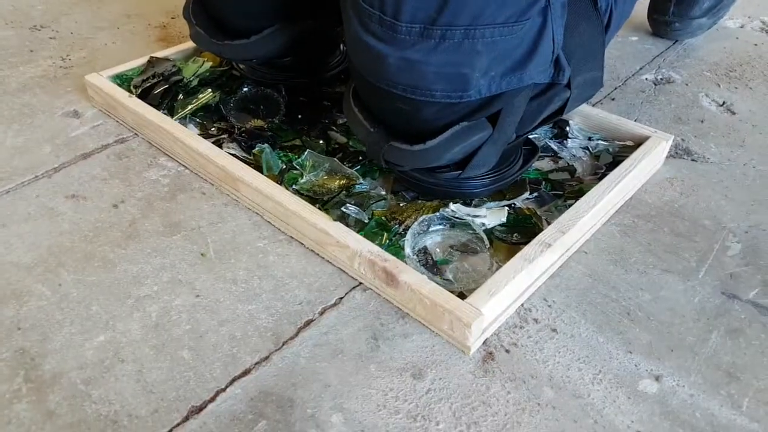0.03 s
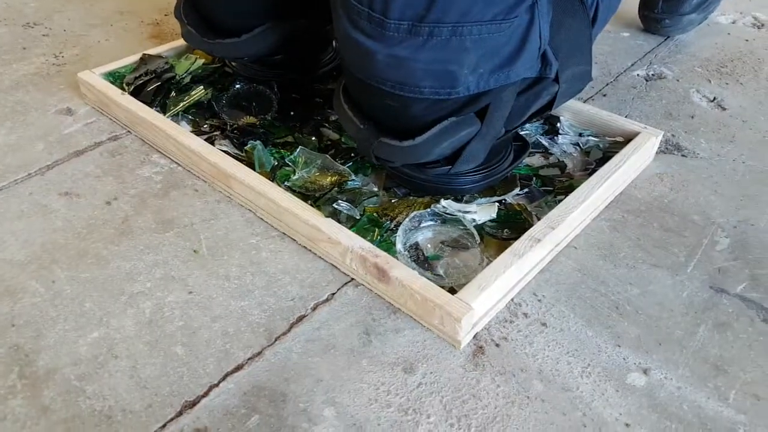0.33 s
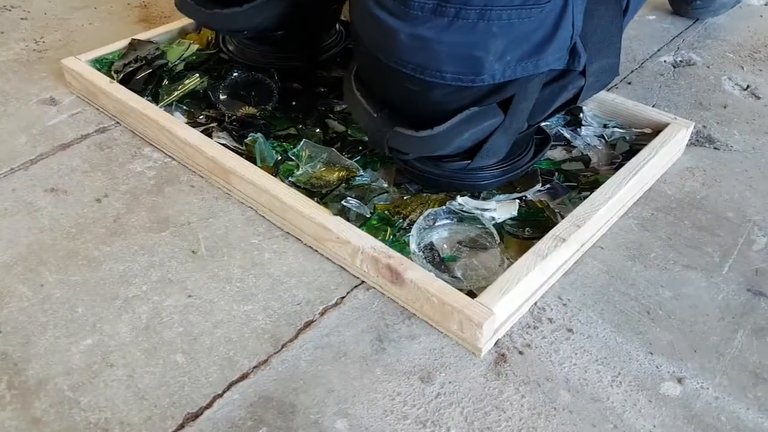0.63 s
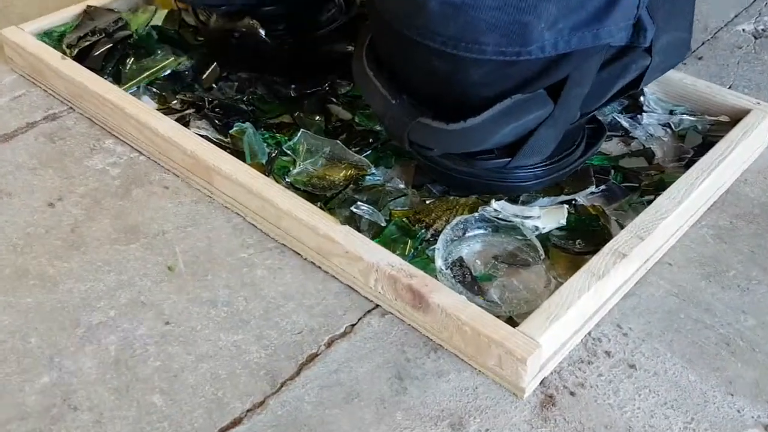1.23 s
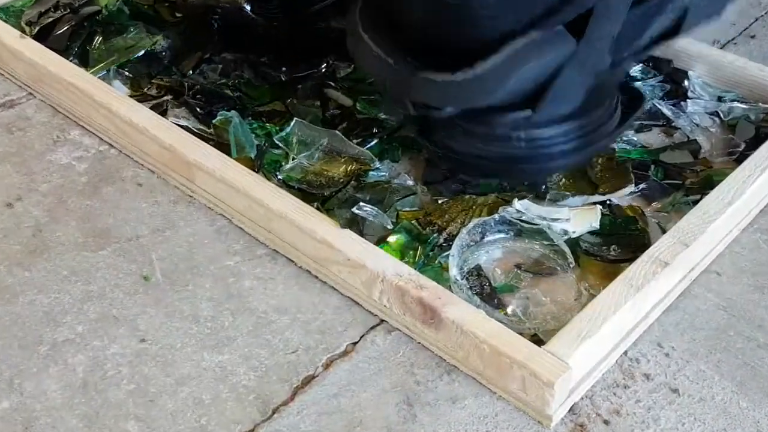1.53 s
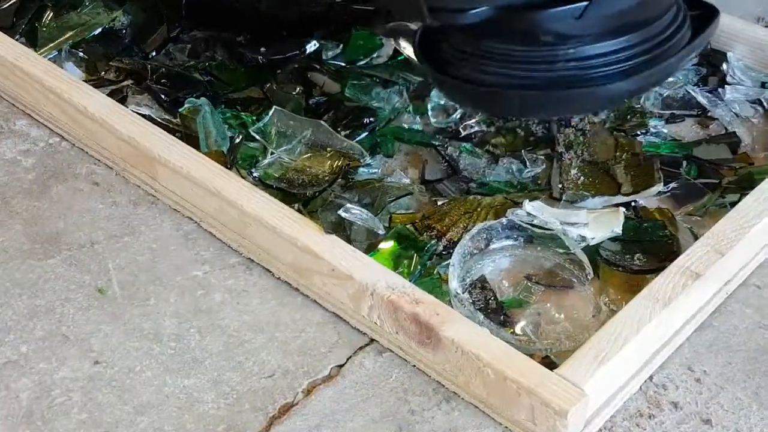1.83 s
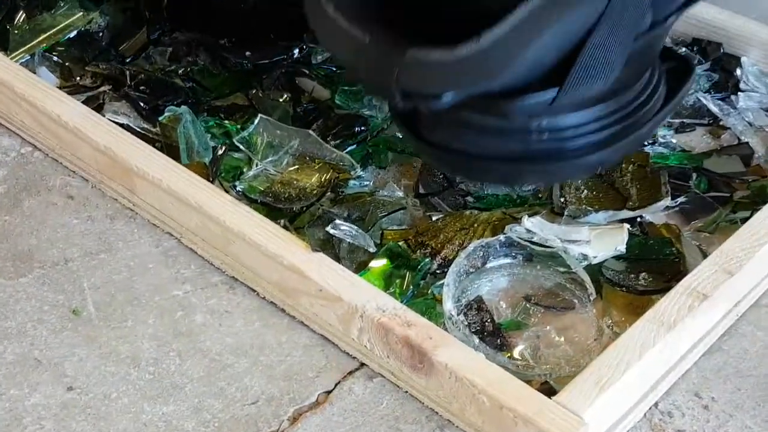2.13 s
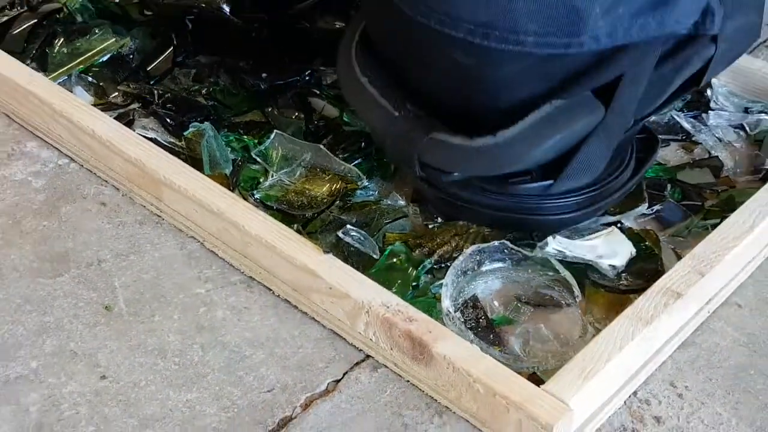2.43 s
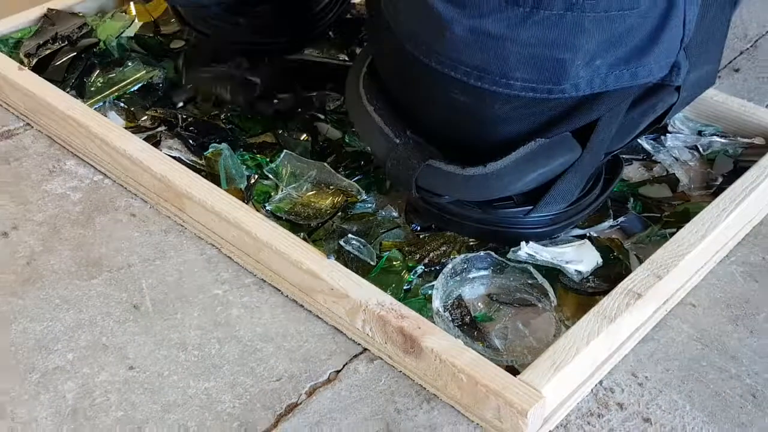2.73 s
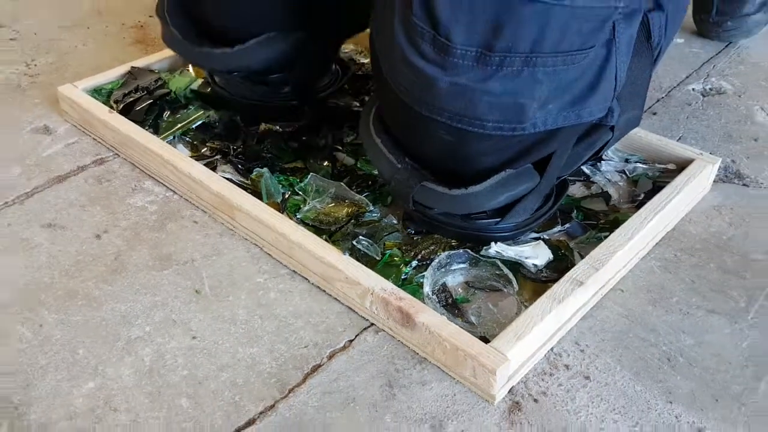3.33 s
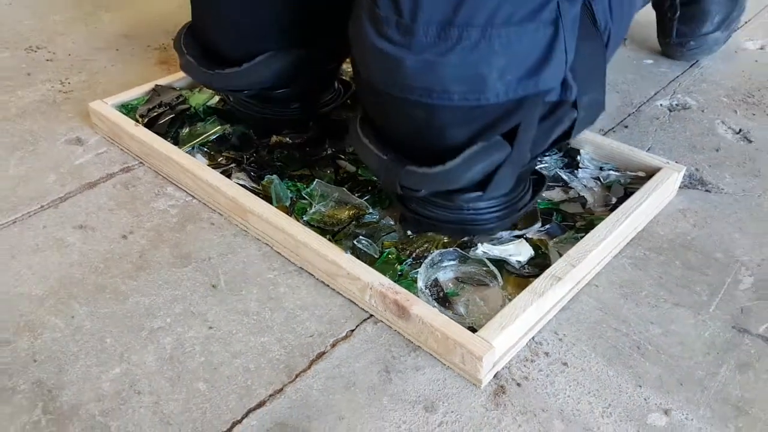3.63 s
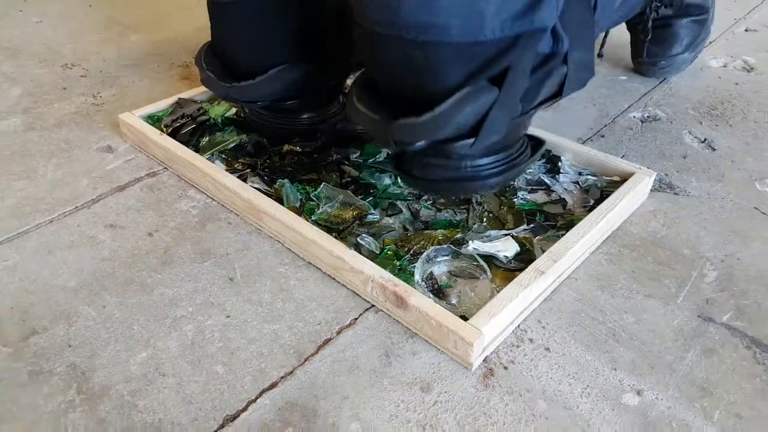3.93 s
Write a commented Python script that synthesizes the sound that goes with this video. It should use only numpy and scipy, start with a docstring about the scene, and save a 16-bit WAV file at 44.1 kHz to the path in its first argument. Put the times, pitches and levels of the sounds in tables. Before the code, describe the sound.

Broken glass crunches, cracks and clinks under a person's shifting knees in an echoing room.

```python
"""Padded knees shift on broken bottles in a wooden tray on the concrete floor of a hard, echoing room.
A low rumble and faint trouser cloth come first. After half a second the loaded shards start to grind
and snap, and loose pieces slip and clink. Scattered cracks build to a heavy push near 2.5 s, which
knocks shards against the floor of the tray. A lull follows near 3 s, then a last run of fractures
ends in a sharp crack and a knock near 3.8 s."""
import sys
import numpy as np
from scipy import signal
from scipy.io import wavfile
from scipy.ndimage import uniform_filter1d, minimum_filter1d

SR = 44100
rng = np.random.default_rng(int(sys.argv[2]) if len(sys.argv) > 2 else 0)


def to_wav(sig):
    """Store sig (one row per channel, or 1-D mono) as 16-bit WAV at the path in sys.argv[1].

    Samples outside -1..1 are clipped; the rate is SR.
    """
    pcm = np.clip(np.atleast_2d(sig), -1, 1) * 32767
    pcm = np.round(pcm).astype(np.int16)
    wavfile.write(sys.argv[1], SR, pcm.T)  # frames by channels


N = 176400
TIME = np.arange(N) / SR
CUTOFF_HZ, SNAP_PAN_DB = 15800, -12

# Shards breaking: time_s, snap_db, treble_db, pitch_hz
FRACTURES = [(0.5176, -38, -41, 3500), (0.5704, -31, -42, 3170), (0.7084, -21.5, -27.5, 3760),
             (0.7695, -7.5, -24, 3160), (1.139, -26, -36, 2000), (1.1934, -22, -39, 2260),
             (1.3863, -31, -43, 3710), (1.5268, -28.5, -30, 3900), (1.548, -24.5, -32.5, 3800),
             (1.5812, -22.5, -29.5, 3030), (1.83, -23, -35.5, 3780), (1.958, -19.5, -30, 3720),
             (2.2077, -15.5, -26.5, 4000), (2.3017, -18, -33, 3530), (2.3667, -18.5, -22, 3800),
             (2.4359, -20.5, -38, 3200), (2.5266, -12, -19, 2700), (2.5965, -10.5, -19.5, 3320),
             (2.6412, -17, -23, 2930), (2.967, -39, -47, 4000), (3.2336, -38.5, -45, 3700),
             (3.2636, -35, -43, 3270), (3.4108, -22, -31.5, 3240), (3.4249, -17, -51, 3590),
             (3.488, -17, -33, 3620), (3.527, -16, -32, 3660), (3.596, -18, -23, 3840),
             (3.6332, -16, -28.5, 3480), (3.6906, -18.5, -24, 3700), (3.7759, -8, -20.5, 3120)]
# Spectrum of glass grinding on glass: frequency_hz, density_db
GRIND_SPECTRUM = [(120, -75), (350, -4.5), (2400, -3.5), (3400, -0.5), (4700, -22), (6600, -18),
                  (9000, -49), (13000, -17), (16000, -31.5)]
# Stereo image of the bed of shards: frequency_hz, left_over_right_db, correlation
BED_IMAGE = [(155, -14, 0.97), (1050, 1, 0.25), (3500, -9, 0.18), (10400, 13, 0.059)]


def from_db(db):
    """Amplitude grows tenfold every 20 dB."""
    return 10 ** (np.asarray(db) / 20)


def rms_one(x):
    """Normalise to unit mean power."""
    return x / np.sqrt(np.mean(x ** 2) + 1e-20)


def at_hz(points, hz, column=1):
    """Interpolate a table column on a logarithmic frequency axis."""
    table = np.array(points)
    return np.interp(np.log(hz), np.log(table[:, 0]), table[:, column])


def band(x, low_hz, high_hz):
    """Causal Butterworth band-pass."""
    sos = signal.butter(2, [low_hz, min(high_hz, .48 * SR)], "band", fs=SR, output="sos")
    return signal.sosfilt(sos, x + 1e-18)


def pan(db):
    """A level difference, left over right, places a source at constant power."""
    return rms_one(from_db(np.array([[db], [-db]]) / 2))


def stereo(pair, correlation):
    """The sum and difference of two independent signals set the correlation between the ears."""
    mid = np.sqrt(1 + correlation) * pair[0]
    side = np.sqrt(1 - correlation) * pair[1]
    return (mid + side * [[1], [-1]]) / np.sqrt(2)


def add(out, time_s, sound):
    """Superpose a short sound at a given time."""
    i = int(time_s * SR)
    out[:, i:i + sound.shape[1]] += sound[:, :N - i]


def noise_bands(size):
    """Split independent noises into half-octave bands: centre_hz, noise pair."""
    edges_hz = 22 * 2 ** (np.arange(20) / 2)
    white = rng.standard_normal((2, 2, size))
    return [(np.sqrt(low * high), band(white[k % 2], low, high))
            for k, (low, high) in enumerate(zip(edges_hz, edges_hz[1:]))]


def coloured_noise(spectrum, levels):
    """Weighted noise bands sum to a fixed spectrum whose level follows a contour in time."""
    noise = sum(from_db(at_hz(spectrum, hz)) * stereo(pair, at_hz(BED_IMAGE, hz, column=2))
                for hz, pair in noise_bands(N))
    return from_db(np.interp(TIME, *np.transpose(levels))) * rms_one(noise)


def impulses(per_s, spread_db=2.5):
    """A Poisson train of clicks, many small and a few large."""
    occurs = rng.random(N) < per_s / SR
    return occurs * from_db(spread_db * np.minimum(rng.exponential(1, N), 3.5))


def ring(clicks, hz, t60_s):
    """A two-pole resonator answers each click with a damped sine."""
    radius, angle = from_db(-60 / (t60_s * SR)), 2 * np.pi * hz / SR
    return signal.lfilter([0, np.sin(angle)], [1, -2 * radius * np.cos(angle), radius ** 2], clicks + 1e-18)


def equal_energy(x, length_s=0.0034):
    """Give each channel of a transient the energy of unit power held for length_s."""
    return x / np.sqrt(np.sum(x ** 2, axis=1, keepdims=True) / (length_s * SR))


def burst(fall_s, low_hz, high_hz, correlation):
    """A broadband transient: exponentially decaying noise in one band."""
    t = TIME[:SR // 30]
    noise = stereo(rng.standard_normal((2, len(t))), correlation)
    return equal_energy(band(noise * np.exp(-t / fall_s), low_hz, high_hz))


def rumble():
    """Low-frequency noise fills the room, slowly swelling and sinking."""
    # Loudness contour: time_s, level_db
    swell = [(0, -36.5), (.8, -38.5), (1.0, -50.5), (1.35, -50), (1.7, -39.5), (2.6, -39.5), (3.2, -46),
             (4, -42.5)]
    # Rumble spectrum: frequency_hz, density_db
    spectrum = [(30, -37), (80, -11.5), (105, 3.5), (145, -8), (250, -14.5), (5000, -58)]
    return coloured_noise(spectrum, swell)


def cloth():
    """Friction of trousers and knee pads radiates faint broadband noise."""
    # Strength of the rubbing: time_s, level_db
    rubbing = [(.2, -54.5), (.4, -50), (1.0, -60), (1.45, -48.5), (3.2, -47.5), (3.7, -42)]
    # Rustle spectrum: frequency_hz, density_db
    spectrum = [(100, -21.5), (450, 11.5), (3000, -3), (15000, -39)]
    return coloured_noise(spectrum, rubbing)


def room(x, first_echo_s=0.0021, full_s=0.022, early_t60_s=0.15):
    """Reverberation: hard walls return early echoes, then a tail that lasts longest in the midrange."""
    # Wall reflections: frequency_hz, early_db, tail_db, tail_t60_s
    reflections = [(199, -3, -12, 0.36), (1120, -4, -7, 1.7), (3770, -8, -10, 0.44), (7100, -2, -3, 0.54),
                   (10200, -8.5, -22, 0.16)]
    t = TIME[:SR * 3 // 2]
    onset = np.interp(t, [first_echo_s, full_s], [0, 1])
    age = np.maximum(t - full_s, 0)
    response = 0
    for hz, pair in noise_bands(len(t)):
        early_db, tail_db, tail_t60_s = (at_hz(reflections, hz, column) for column in (1, 2, 3))
        early, tail = (onset * from_db(-60 * age / t60_s) for t60_s in (early_t60_s, tail_t60_s))
        envelope = np.hypot(from_db(early_db) * early / np.linalg.norm(early),
                            from_db(tail_db) * tail / np.linalg.norm(tail))
        response = response + envelope * stereo(pair, correlation=1 / (1 + (hz / 700) ** 2))
    # The echo is notched near 4 kHz, so the highest snaps sound dry.
    response = signal.lfilter(*signal.iirnotch(4000, Q=5.6, fs=SR), response)
    return signal.fftconvolve(x.mean(axis=0, keepdims=True), response, axes=1)[:, :N]


def clinks(tick_db=2.5, tick_fall_s=0.0058, flutter_depth=0.99, flutter_hz=67):
    """Modal ringing: a contact tick excites a loose shard, whose higher modes decay sooner."""
    # Loose shards by name: t60_s at reference_hz, modes as (pitch_hz, level_db)
    shards = { "a": (0.071, [(4554, -9), (7278, -5.5), (8382, -18), (12618, -8), (13955, -4.5)]),
              "b": (0.19, [(12450, 0.5), (12950, -9), (15300, -2)]), "c": (0.05, [(6615, 16)]),
              "d": (.42, [(5335, -13), (5766, -1.5), (7950, -14), (9170, -11), (10200, -9), (13775, -6)]),
              "e": (.5, [(11843, 1), (14168, 3)]), "f": (0.14, [(5722, -2.5), (7865, -3), (13065, 10)])}
    # Strikes on them: time_s, shard, level_db
    strikes = [(0.9105, "a", -28), (0.924, "a", -29.5), (1.193, "f", -40.5), (2.1496, "b", -36.5),
               (2.341, "c", -28.5), (2.788, "b", -32), (2.797, "d", -31), (2.871, "d", -47),
               (2.892, "b", -42), (3.316, "f", -30), (3.334, "b", -30), (3.775, "e", -35.5)]
    reference_hz = 8300
    out, t = np.zeros((2, N)), TIME[:SR]
    slow = signal.butter(2, flutter_hz, fs=SR, output="sos")
    for time_s, shard, level_db in strikes:
        contact = rng.standard_normal((2, SR)) * np.exp(-t / tick_fall_s)
        sound = from_db(tick_db) * band(contact, 1800, CUTOFF_HZ)
        shard_t60_s, modes = shards[shard]
        for hz, mode_db in modes:
            t60_s = shard_t60_s * reference_hz / hz
            # Rocking on its neighbours modulates the ringing, differently at each ear.
            flutter = 1 + flutter_depth * rms_one(signal.sosfilt(slow, rng.standard_normal((2, SR))))
            tone = np.sin(2 * np.pi * (hz * t + rng.uniform(0, 1, (2, 1))))
            sound = sound + from_db(mode_db - 60 * t / t60_s) * flutter * tone
        add(out, time_s, from_db(level_db) * sound * pan(db=3))
    return out


def knee_pressure(rise_db=9, fall_db=21.5):
    """Incoherent sources add in power: the pushes sum to a body and a treble envelope for the bed."""
    # A knee loads the bed: start_s, peak_s, end_s, level_db, treble_lift_db
    pushes = [(0.565, 0.63, 3.5, -42.5, 3), (0.696, 0.73, 0.75, -28.5, 9.5), (0.785, 0.776, 0.9, -29, 3),
              (1.05, 1.15, 1.35, -33, 7), (1.433, 1.58, 1.78, -36, -3.5), (2.084, 2.132, 3.1, -42, 0),
              (2.32, 2.327, 2.493, -21, 4.5), (2.593, 2.33, 2.88, -22, 4.5),
              (2.756, 2.815, 3.023, -34, -19), (3.268, 3.35, 3.444, -23.5, 5.5),
              (3.34, 3.546, 3.79, -31, -2.5), (3.756, 3.84, 4, -39, 8.5)]
    body_power, treble_power = np.zeros(N), np.zeros(N)
    for start_s, peak_s, end_s, level_db, lift_db in pushes:
        swell_db = np.interp(TIME, [start_s, peak_s, end_s], [-rise_db, 0, -fall_db])
        gain = from_db(level_db + swell_db) * (TIME > start_s) * (TIME < end_s)
        body_power += gain ** 2
        treble_power += (gain * from_db(lift_db)) ** 2
    return np.sqrt(body_power), np.sqrt(treble_power)


def tinkles(treble, count=40, relative_db=-16.5):
    """Free vibration: small splinters ring briefly, each at its own pitch and place."""
    clicks, struck = impulses(per_s=360), rng.integers(0, count, N)
    out = 0
    for k, hz in enumerate(rng.uniform(4430, CUTOFF_HZ, size=count)):
        ringing = from_db(at_hz(GRIND_SPECTRUM, hz)) * ring(clicks * (struck == k), hz, t60_s=0.019)
        out = out + ringing * pan(at_hz(BED_IMAGE, hz) + rng.normal(0, 36))
    return from_db(relative_db) * treble * rms_one(out)


def grinding(body, treble, chip_fall_s=0.0009, crossover_hz=4500):
    """Shot noise: edges chip against each other in a dense run of tiny cracks."""
    decay = np.exp(-2 / (chip_fall_s * SR))
    chip_power = signal.lfilter([1], [1, -decay], impulses(per_s=800) ** 2 + 1e-12)
    roughness = np.sqrt(chip_power / chip_power.mean())
    low, high = 0, 0
    for hz, pair in noise_bands(N):
        placed = stereo(pair, at_hz(BED_IMAGE, hz, column=2)) * pan(at_hz(BED_IMAGE, hz))
        part = from_db(at_hz(GRIND_SPECTRUM, hz)) * placed
        if hz < crossover_hz:
            low = low + part
        else:
            high = high + part
    return roughness * (low * body + high * treble) / np.std(low + high)


def knocks(fall_s=0.0022, width_octaves=1.5):
    """Heavily damped impacts: the weight drives shards against the floor of the tray."""
    # Hollow blows: time_s, level_db, pitch_hz
    blows = [(1.139, -27.5, 530), (2.527, -7.5, 1330), (2.5967, -7, 1200), (2.641, -18.5, 560),
             (3.7752, -17, 417)]
    out, spread = np.zeros((2, N)), 2 ** (width_octaves / 2)
    for time_s, level_db, hz in blows:
        add(out, time_s, from_db(level_db) * burst(fall_s, hz / spread, hz * spread, correlation=1))
    return out


def snap(hz, rise_s=0.00045, left_lead_s=0.00005, aftershock_s=0.001568, aftershock_db=-12):
    """Damped oscillation: a pinned shard swings as it breaks, then more weakly as the fracture runs on."""
    t = TIME[:SR // 30] + [[left_lead_s], [0]]
    out = 0
    for delay_s, db in ((0, 0), (aftershock_s * rng.uniform(0.52, 1.441), aftershock_db)):
        age = np.maximum(t - delay_s, 0)
        out = out + from_db(db) * age * np.exp(-age / rise_s) * np.sin(2 * np.pi * hz * age)
    return equal_energy(out)


def small_snaps(body, count=8, relative_db=-6):
    """Acoustic emission: under load, lesser shards snap at random, at pitches of the large fractures."""
    pitches_hz = rng.choice([hz for *_, hz in FRACTURES], size=count)
    clicks, broken = impulses(per_s=45), rng.integers(0, count, N)
    out = sum(signal.fftconvolve([clicks * (broken == k)], snap(hz), axes=1)[:, :N]
              for k, hz in enumerate(pitches_hz))
    return from_db(relative_db) * body * rms_one(out) * pan(SNAP_PAN_DB)


def cracks(fall_s=0.0023, body_corner_hz=2700, body_db_per_octave=4):
    """Brittle fracture: each break releases a pitched snap inside a few milliseconds of noise."""
    # Noise of the shard's body, edge and splinter: low_hz, high_hz, trim_db, left_over_right_db
    parts = [(1200, 3800, -2, -4.5), (5180, 7250, -4, 15), (10500, 15400, -6.5, 8.5)]
    out = np.zeros((2, N))
    for time_s, snap_db, treble_db, hz in FRACTURES:
        add(out, time_s, snap(hz) * pan(SNAP_PAN_DB) * from_db(snap_db))
        # Smaller, higher-pitched shards have less body.
        body_db = snap_db - body_db_per_octave * max(np.log2(hz / body_corner_hz), 0)
        for db, (low_hz, high_hz, trim_db, pan_db) in zip((body_db, treble_db, treble_db), parts):
            noise = burst(fall_s, low_hz, high_hz, correlation=0.69)
            add(out, time_s, noise * pan(pan_db) * from_db(db + trim_db))
    return out


def scene():
    """Superposition: breaking glass excites the room; clinks, rumble and cloth arrive direct."""
    body, treble = knee_pressure()
    breaking = cracks() + knocks() + grinding(body, treble) + small_snaps(body) + tinkles(treble)
    return rumble() + breaking + room(breaking) + clinks() + cloth()


def record(dry, ceiling=0.9, window_s=0.00041):
    """Peak limiting holds down the biggest cracks; a steep low-pass then cuts the top."""
    size = int(window_s * SR)
    gain = np.minimum(1, ceiling / (np.abs(dry).max(axis=0) + 1e-9))
    limited = dry * uniform_filter1d(minimum_filter1d(gain, size), size)
    return signal.sosfilt(signal.ellip(10, .1, 80, CUTOFF_HZ, fs=SR, output="sos"), limited)


dry = scene()
out = record(dry)
to_wav(out)
```